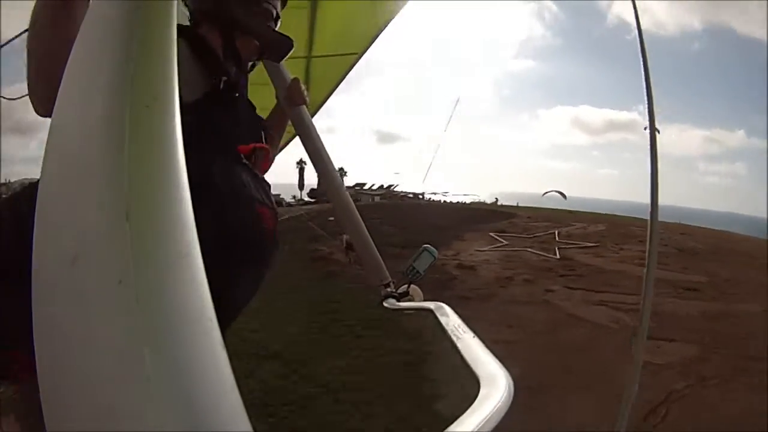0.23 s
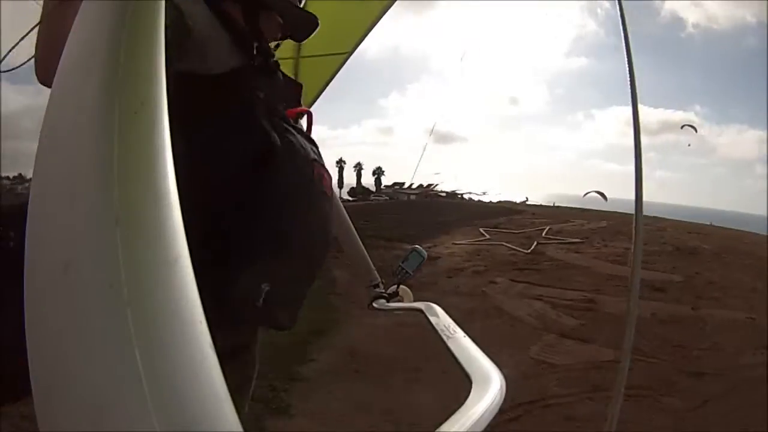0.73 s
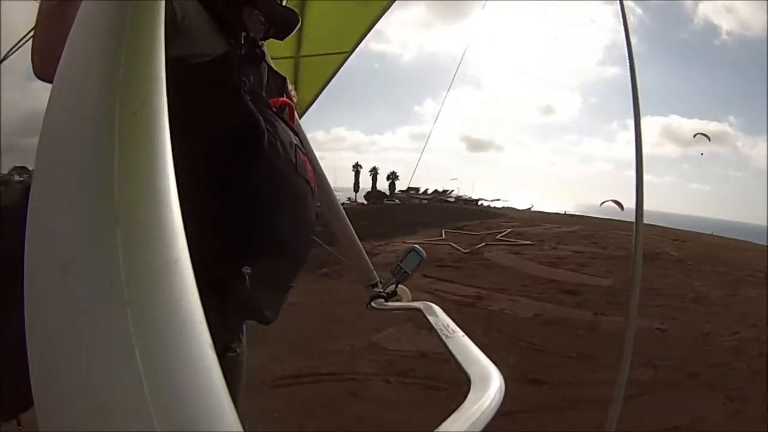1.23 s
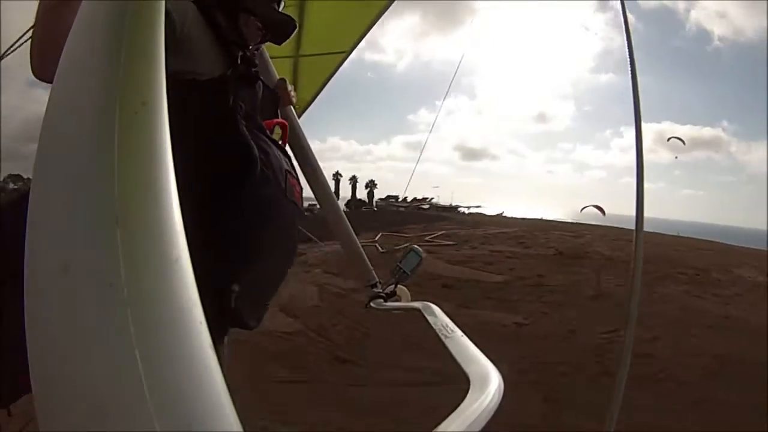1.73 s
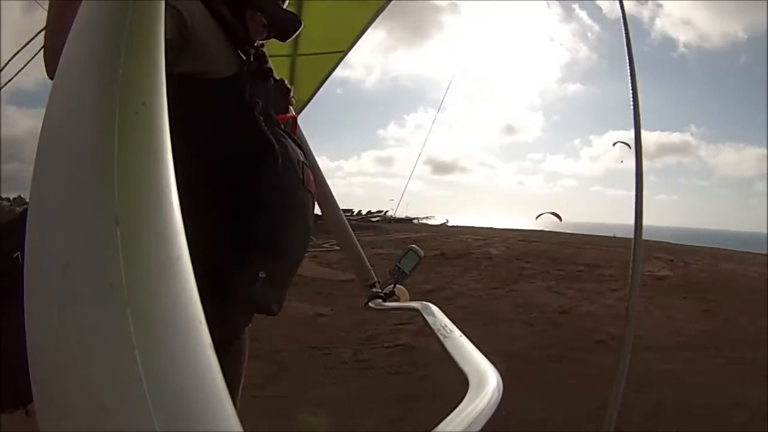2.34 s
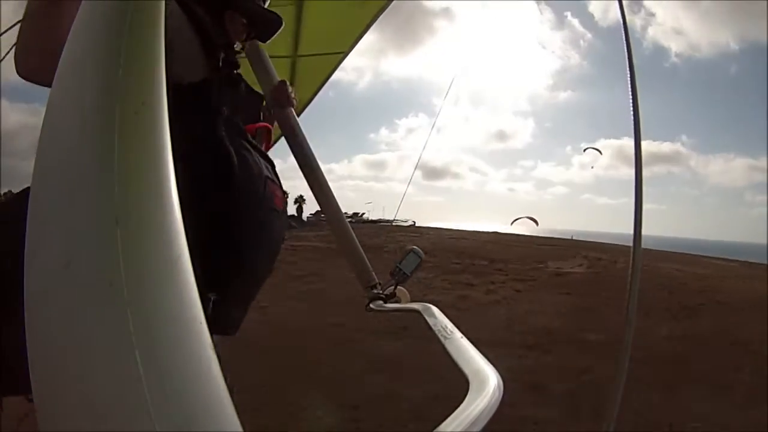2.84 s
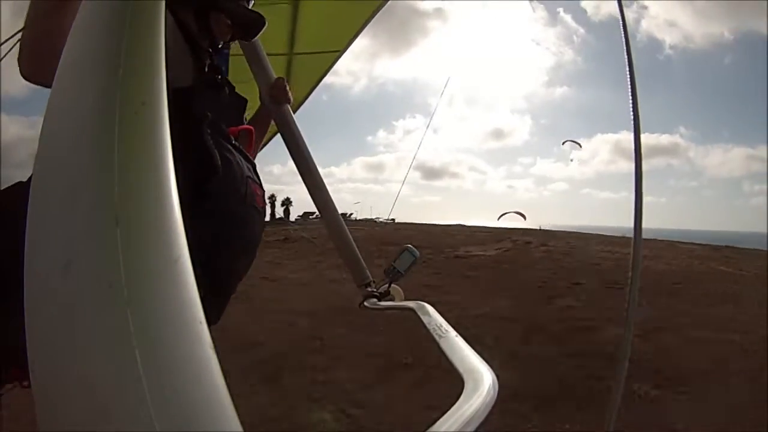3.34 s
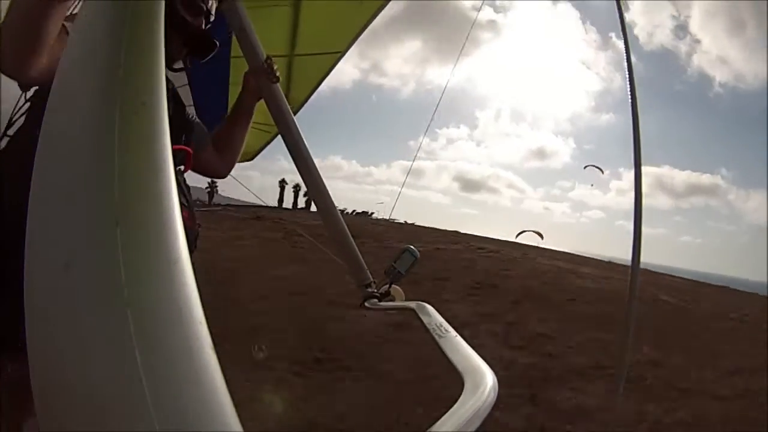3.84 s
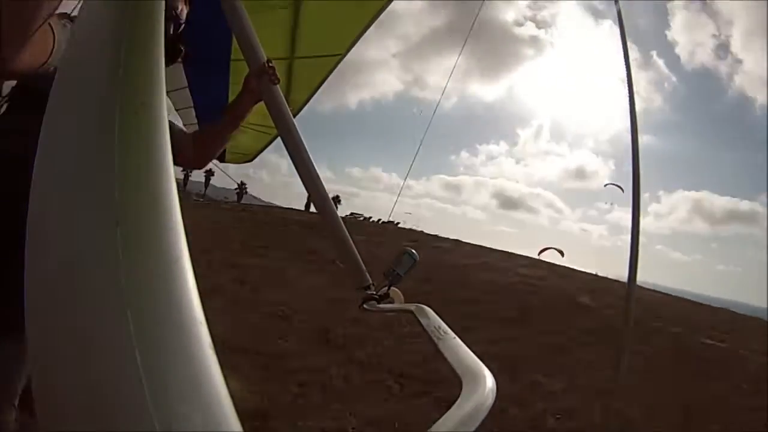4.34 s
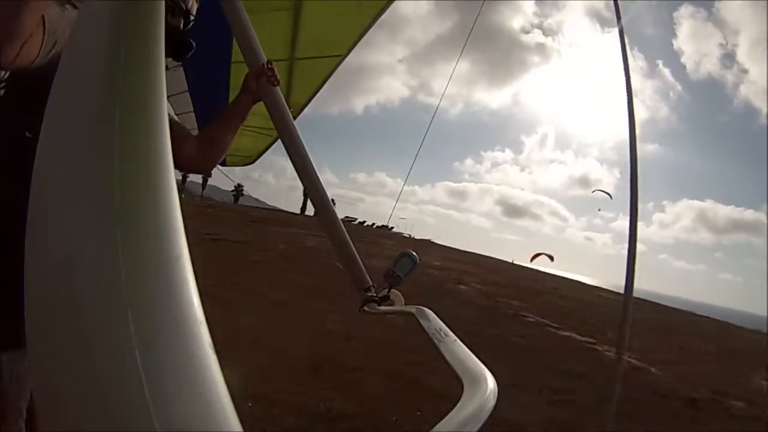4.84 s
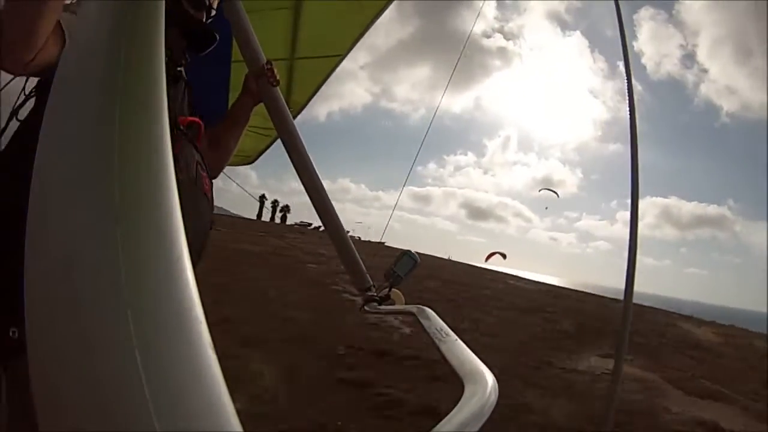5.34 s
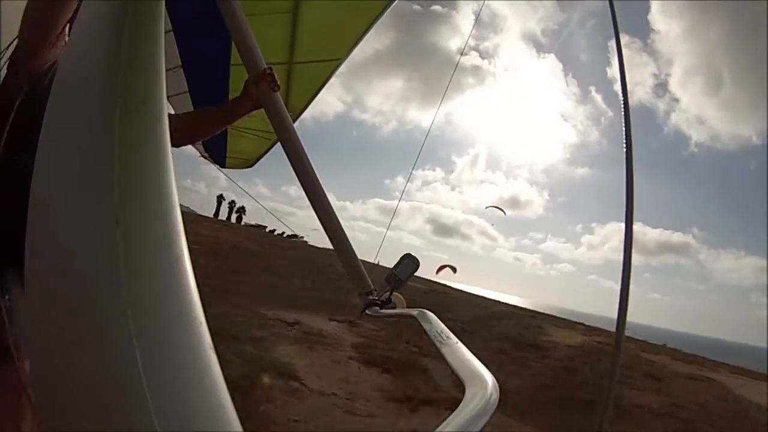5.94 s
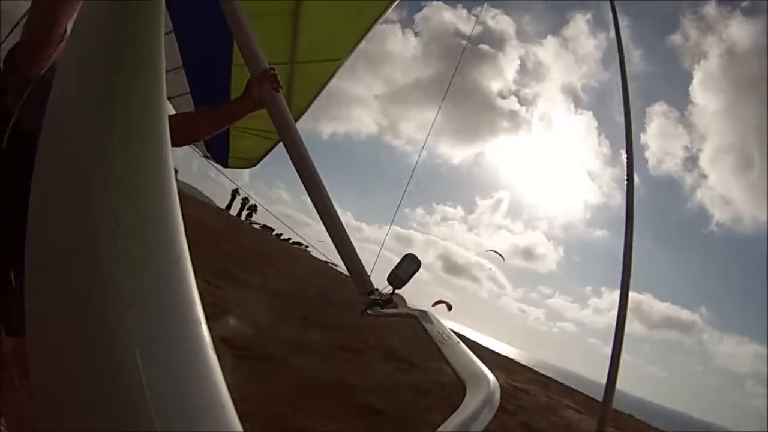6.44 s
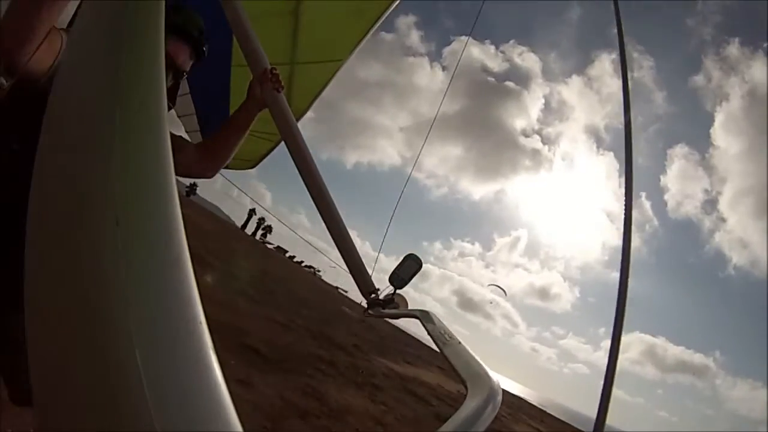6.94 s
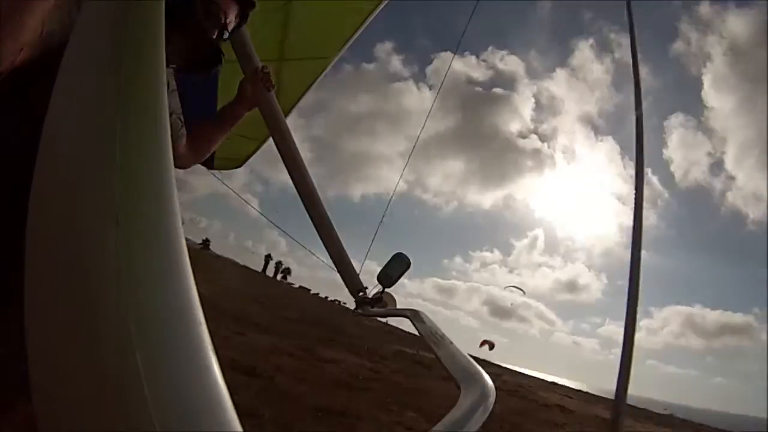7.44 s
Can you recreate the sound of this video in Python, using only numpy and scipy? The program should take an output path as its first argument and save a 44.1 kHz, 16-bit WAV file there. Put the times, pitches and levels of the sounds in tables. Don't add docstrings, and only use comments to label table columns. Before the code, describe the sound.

Outdoors on a flying hang glider, wind strikes a small frame-mounted camera's microphone directly: low rumbling buffets, fluttering rush and hiss, irregular heavy thumps and tiny ticks. After about six seconds loose fittings knock the aluminium tube; the rush then eases and a hand drags noisily along it, with a cluster of hard, short metallic knocks.

```python
import sys
import numpy as np
from scipy import signal
from scipy.fft import rfft, irfft, next_fast_len
from scipy.io import wavfile
from scipy.ndimage import uniform_filter1d, map_coordinates

SR = 44100
rng = np.random.default_rng(int(sys.argv[2]) if len(sys.argv) > 2 else 0)


def wav_record(signal):
    frames = np.transpose(np.atleast_2d(signal))
    bounded = np.clip(frames, -1, 1)
    quanta = np.round(bounded * 32767).astype(np.int16)
    wavfile.write(sys.argv[1], SR, quanta)


def ratio(d):
    e = np.asarray(d, float) / 20
    return 10 ** e


N = 339040


def unit(x):
    return x / np.sqrt(np.mean(x ** 2) + 1e-20)


def white():
    return rng.standard_normal(N)


def curves(rows):
    s, *columns = np.transpose(rows)
    return [np.interp(np.arange(N) / SR, s, column) for column in columns]


def wobble(rate):
    knots = rng.standard_normal(int(N * 400 / SR) + 4)
    return map_coordinates(knots, [np.arange(N) * rate / SR])


def coloured(x, spectrum):
    m = next_fast_len(N + 8192)
    f, db = np.transpose(spectrum)
    bins = np.fft.rfftfreq(m, 1 / SR)
    gain_db = np.interp(np.log(bins + 1), np.log(f + 1), db)
    return irfft(rfft(x, m) * ratio(gain_db), m)[:N]


def patchy(patchy_db):
    z = signal.stft(white(), nperseg=512)[2]
    field = uniform_filter1d(rng.standard_normal(z.shape), 6, 0)
    field = uniform_filter1d(field, 8, 1)
    return signal.istft(z * ratio(patchy_db * unit(field)), nperseg=512)[1][:N]


def eddies(rate, spread_db):
    hit = rng.random(N) < rate / SR
    sign = np.sign(white())
    size_db = spread_db * np.minimum(rng.exponential(size=N), 3.5)
    return unit(hit * sign * ratio(size_db))


def steadied(x, seconds, share):
    power = np.abs(uniform_filter1d(x ** 2, int(seconds * SR))) + 1e-12
    return unit(x / power ** (share / 2))


# t/s, pressure level/dB, lean to slow heaving level/dB
PRESSURE = [(0, -11, -19), (.2, -20, 2), (.35, -16.5, 0.5), (1.5, -15.5, -5), (1.9, -17, 0),
            (2.4, -16.5, -2), (3.1, -15, -2.5), (3.7, -18.5, 2.5), (4.4, -18.5, 1.5), (5.15, -17, -1),
            (5.57, -15.5, 4.5), (5.75, -20.5, 2.5), (6.45, -17, -1), (6.63, -15, 0), (7.2, -24.5, -4),
            (7.39, -20, -1.5), (7.5, -31, 3), (7.69, -26.5, 2.5)]
# f/Hz, level/dB per Hz
HEAVE = [(7, -34.5), (14, -11), (33, -1.5), (45, -1.5), (70, -32), (200, -50), (400, -120)]
# f/Hz, level/dB per Hz
BUFFET = [(20, -38), (35, -11), (50, 1), (76, 1.5), (500, -23), (650, -29.5), (1100, -120)]


def pressure_on_port(kicks):
    buffet_db, slow_db = curves(PRESSURE)
    heave_db = -25.5 + 0.05 * (buffet_db + 16.5) + slow_db
    heave = coloured(white(), HEAVE)
    buffet = coloured(patchy(patchy_db=0.75) + 0.45 * kicks, BUFFET) * ratio(1.4 * wobble(32))
    heave = ratio(heave_db + 1.5) * steadied(heave, seconds=0.12, share=0.48)
    return heave + ratio(buffet_db - 1.46) * steadied(buffet, seconds=0.11, share=0.51)


# peak t/s, lift level/dB, width/s
GUSTS = [(.239, 7.5, 0.077), (.43, 0, 0.024), (.58, 1, 0.057), (1.48, 7, .05), (1.66, 4.5, 0.06),
         (1.804, 4.5, 0.06), (1.94, 5.5, 0.073), (2.225, 3.5, 0.12), (2.452, 6.5, 0.034), (2.57, 3, 0.03),
         (2.803, 7.5, 0.042), (3.021, 1.5, 0.036), (3.205, 12, 0.045), (3.34, 6, 0.081), (3.59, 8, 0.069),
         (3.7, 4.5, 0.052), (3.875, 7, 0.1), (4.24, 7, .06), (4.41, 4.5, 0.042), (4.55, 1.5, 0.12),
         (5.22, 4, 0.042), (5.45, 6.5, 0.053), (5.632, 6, 0.042), (5.726, 11, 0.042), (5.891, 7, 0.082),
         (6.3, 6.5, 0.065), (6.585, 14.5, 0.018), (6.68, 10, 0.014), (6.944, 6, 0.036), (7.29, 15, 0.078)]


def gusts_db():
    rise_over_fall, squareness = 0.9, 3.3
    t = np.arange(0, N / SR, .002)
    s, lift_db, width = np.transpose(GUSTS)[:, :, None]
    side_width = width * np.where(t < s, rise_over_fall, 1)
    bells = lift_db * np.exp(-np.abs((t - s) / side_width) ** squareness)
    return np.interp(np.arange(N) / SR, t, bells.sum(0))


# t/s, strength level/dB, lean to coarse eddies level/dB
AIRSTREAM = [(0, -31, -3.5), (.11, -39, -5), (.55, -30, -2), (2.05, -38, -2), (2.55, -35, -3.5),
             (2.63, -41, 0), (2.98, -46.5, 1.5), (3.5, -45.5, -1), (4.05, -51.5, 1.5), (4.3, -35, -2.5),
             (4.78, -49, 9), (5.0, -36.5, 0), (5.55, -44.5, 3), (6.1, -41.5, 0), (6.47, -51, 3),
             (6.8, -61.5, -1), (7.12, -47, -1.5), (7.69, -42, -2)]
# f/Hz, level/dB per Hz
RUSH = [(88, -21), (150, -5.5), (195, -7), (446, -13.5), (603, -13.5), (650, -14), (1020, -15),
        (1100, -22.5), (1640, -29.5), (2140, -37), (3000, -45.5), (3900, -50), (6600, -120)]
# f/Hz, level/dB per Hz
HISS = [(600, -9), (1100, -4), (1400, -13), (1780, -6.5), (2200, -17.5), (2800, -14), (3400, -22),
        (4500, -29.5), (5300, -29), (6200, -37), (8200, -44), (11500, -52), (13500, -68), (15300, -77),
        (16000, -120)]


def flow_past_housing(kicks):
    flow_db, coarse_db = curves(AIRSTREAM)
    hiss_db = flow_db + gusts_db()
    rush_db = -25.5 + 0.57 * (hiss_db + 40.5) + coarse_db
    shelter_db = np.interp(np.arange(N) / SR, [6.97, 7.12], [.6, -11])
    flutter, shiver = wobble(35), wobble(90)
    rush = coloured(patchy(patchy_db=2.5) + 0.42 * kicks, RUSH)
    rush = rush * ratio(0.28 * flutter + shiver)
    hiss = coloured(patchy(patchy_db=-0.06) + 0.52 * kicks, HISS)
    hiss = hiss * ratio(0.27 * flutter + shiver + 0.29 * wobble(30))
    rush = ratio(rush_db + shelter_db) * steadied(rush, seconds=0.087, share=0.13)
    return rush + ratio(hiss_db + 3.0) * unit(hiss)


def wind():
    kicks = eddies(rate=500, spread_db=3.5)
    return pressure_on_port(kicks) + flow_past_housing(kicks)


# t/s, peak level/dB, push +1 or pull -1
THUMPS = [(1.171, -17, -1), (1.237, -12, 1), (1.37, -26, -1), (1.495, -8, 1), (1.6315, -6, -1),
          (1.69, -21, 1), (1.9947, -11, 1), (2.052, -4, -1), (2.4712, -6.5, -1), (2.61, -3.5, 1),
          (3.226, -7, -1), (3.4114, -2.5, -1), (3.638, -3, -1), (3.803, -6.5, 1), (4.4332, -0.5, -1),
          (4.862, -14, -1), (5.482, -13, -1), (5.731, -4.5, -1), (5.8583, -2.5, 1), (5.8938, -8, -1),
          (.0035, -6.5, -1), (0.0143, -2, 1), (.082, -5, -1), (1.525, -10, 1), (1.815, -6, -1),
          (2.151, -7.5, -1), (2.21, -7.5, -1), (2.2574, -10, -1), (2.3339, -8, -1), (2.681, -13, -1),
          (3.0627, -7.5, 1), (3.2913, -7, 1), (3.594, -3, -1), (3.963, -5.5, 1), (4.139, -6, 1),
          (4.2776, -5.5, -1), (4.601, -9, -1), (4.709, -5, 1), (4.939, -11, 1), (4.987, -10, 1),
          (5.132, -8, 1), (5.235, -5.5, -1), (5.538, -4.5, 1), (5.63, -5, -1), (6.0492, -5.5, -1),
          (6.689, -9, -1), (6.84, -9, -1), (6.958, -16, -1), (6.1323, -4, 1), (6.282, -3, 1),
          (6.4985, -3.5, 1), (6.5866, -1, -1)]


def thumps():
    t, swings = np.arange(N) / SR, np.zeros(N)
    for s, db, sign in THUMPS:
        u = (t - s) / .0014
        swing = np.exp(-u ** 2) - .5 * np.exp(-((u - 3) / 2) ** 2)
        swings += sign * ratio(db - 2) * swing
    return swings


# t/s, peak level/dB
TICKS = [(0.3232, -22), (.1955, -42), (.2855, -40), (.379, -41), (1.136, -45), (1.162, -43), (1.521, -45),
         (1.622, -46), (1.711, -40), (1.93, -47), (1.993, -41.5), (2.332, -47), (2.574, -45), (3.213, -49),
         (3.226, -48), (4.318, -46), (4.558, -48), (4.826, -51), (5.004, -49), (5.236, -46), (5.298, -49),
         (5.308, -48), (5.525, -46), (5.742, -41), (5.95, -45), (5.957, -46), (6.06, -45), (7.156, -45),
         (2.9605, -45), (3.4121, -42), (3.5746, -45), (3.595, -46), (3.8447, -48), (3.883, -48),
         (3.963, -48.5), (4.1256, -45), (4.137, -49), (4.2377, -42), (4.2777, -49), (4.304, -39.5),
         (4.457, -37), (4.7092, -42), (4.8874, -43), (5.6464, -43.5), (5.858, -42), (6.1769, -34),
         (6.289, -33.5), (6.3445, -34), (6.427, -32), (6.436, -39.5), (6.587, -41), (6.6892, -45.5),
         (7.2193, -27), (7.379, -13), (7.5268, -39), (7.6875, -38)]


def ticks():
    out, t = np.zeros(N + SR), np.arange(200) / SR
    for s, db in TICKS:
        dull = np.clip(-.02 * (db + 24.0), 0, .45)
        snap = signal.lfilter([1, dull], [1, -dull], rng.standard_normal(len(t)))
        out[round(s * SR):][:len(t)] += ratio(db - 5.0 - 60 * t / 0.0044) * snap
    return coloured(out[:N], [(1000, -21.5), (3000, 15.0), (4200, 13), (5500, 7), (7000, 8), (9500, -4),
                              (11800, 1), (13600, -14), (15000, -3.5), (16200, -35.5)])


# t/s, strength level/dB,
# favoured low mode f/Hz, hardness level/dB, metal share level/dB
KNOCKS = [(0.217, -21.5, 501, -3.5, -6), (6.03, -22, 600, -7, -10), (6.106, -15, 620, -13, -16),
          (6.36, -20, 584, -9, -5), (6.478, -12.5, 649, -11, -9), (6.4905, -5, 664, -13.5, -1),
          (6.514, -15, 649, -9, -15), (6.819, -24.5, 538, -11, -14), (6.852, -28.5, 662, -5, -20),
          (6.899, -7, 607, -47, -5), (6.9535, -12, 1140, -9.5, -2), (6.99, -20.5, 649, -14, -17),
          (7.0245, -9.5, 579, -3, -6.5), (7.071, -18, 646, -16, -12), (7.114, -24, 835, -11, -14),
          (7.146, -8, 583, -23, -19), (7.175, -8, 867, -11, -15), (7.194, -8.5, 587, -22, -1),
          (7.223, -13, 848, -11, -11), (7.239, -9.5, 619, -18, -12), (7.2695, -3, 840, -6.5, -12),
         (7.28, -6.5, 806, -25, -8), (7.289, -13, 814, -14, -3), (7.304, -6.5, 589, -12, -21),
         (7.329, -16, 630, -19, -7), (7.345, -6.5, 590, -42, 2), (7.367, -2, 560, -37, -1),
         (7.378, -3.5, 796, -10, -7), (7.391, 0.5, 820, -12, -4), (7.407, -10, 587, -7, -12),
         (7.463, -10.5, 640, -18, -8), (7.581, -24.5, 845, 2.5, -7.5), (7.6197, -13, 622, -2.5, -17),
         (7.644, -22, 554, -23, -3), (7.666, -12.5, 820, -8.5, -8),
          (6.483, -9, 649, -18, -8), (6.4965, -8, 655, -15.5, 0), (6.502, -13.5, 650, -14, -1),
            (7.03, -10.5, 960, -5, -9), (7.035, -16, 580, -12, -8), (7.142, -11.5, 840, -9.5, -16),
            (7.305, -22, 840, -5, -20), (6.909, -18, 610, -36, -8), (7.624, -16.5, 830, -14, -21),
            (5.805, -14, 1140, -17, -10), (6.205, -21, 952, -17, -10)]
# f/Hz, level/dB, t60/s
TUBE = [(579, 7, 0.026), (649, -7, 0.067), (840, 1.5, 0.042), (952, 4, 0.017), (1140, 2.5, 0.023),
        (1463, -8.5, 0.035), (1830, -3, 0.03), (1948, -0.5, 0.015), (2157, -7.5, 0.029),
        (2556, -6.5, 0.032), (2745, -3.5, 0.024), (3200, -2.5, 0.023), (3520, -7.5, 0.019),
        (3690, -11, 0.024), (4480, -18.5, 0.025), (5300, -30, .02)]


def tube_blow(t, low_db, low_hz, hard_db, metal_db, shake):
    hz, mode_db, t60 = np.transpose(TUBE)[:, :, None]
    middle_db = low_db + hard_db
    high_db = middle_db + metal_db
    length = 0.73 - 0.0358 * low_db
    rattle = ratio(middle_db - 10.5 - 60 * t / 0.054) * shake
    strength, detune, phase = rng.standard_normal((3, len(TUBE), 1))
    favoured_db = low_db - 16 * np.abs(np.log2(hz / low_hz))
    upper_db = np.where(hz < 2400, middle_db + 3, high_db + 3)
    group_db = np.where(hz < 1300, favoured_db, upper_db)
    swell = 1 - np.exp(-t * hz / 3.56)
    fade_db = -60 * (t / (t60 * length)) ** 1.19
    level = ratio(group_db + mode_db + 2.64 * strength + fade_db)
    modes = level * np.sin(2 * np.pi * (hz * (1 + .032 * detune) * t + phase))
    grate_db = 1.5 * unit(uniform_filter1d(rng.standard_normal(len(t)), 90))
    return rattle + ratio(grate_db) * np.sum(swell * modes, 0)


# t/s, peak level/dB, t60/s
PINGS = [
    (0.2179, -32, 0.14),
    (6.3579, -36, 0.099),
    (6.4911, -27, 0.14),
    (7.0239, -26.5, 0.12),
    (7.3904, -24, 0.062),
]


def ping(t, db, ring):
    drift_hz = 90 * np.exp(-t / 0.022) + 25 * uniform_filter1d(rng.standard_normal(len(t)), 60)
    sag = 2 * np.pi * np.cumsum(drift_hz) / SR
    pair = np.sin(2 * np.pi * 3490 * t + sag) + 0.63 * np.sin(2 * np.pi * (3490 + 18) * t + sag)
    return ratio(db + 1.0 - 60 * t / ring) * (1 - np.exp(-t / 0.0014)) * pair


def knocks():
    out, t = np.zeros(N + SR), np.arange(SR // 6) / SR
    blows = KNOCKS
    rattle = unit(coloured(white(), HISS))[:len(t) * len(blows)].reshape(-1, len(t))
    for (s, *blow), shake in zip(blows, rattle):
        out[round(s * SR):][:len(t)] += tube_blow(t, *blow, shake)
    for s, db, ring in PINGS:
        out[round(s * SR):][:len(t)] += ping(t, db, ring)
    return coloured(out[:N], [(300, -5.5), (500, -2), (5500, -1.0), (9000, -18), (16000, -39)])


# t/s, level/dB
PUFFS = [(0.668, -30), (0.847, -23), (1.904, -23), (2.243, -26), (2.454, -39), (2.704, -36), (2.807, -28),
         (3.093, -36), (3.571, -28), (3.806, -36), (3.887, -24), (4.14, -29), (4.562, -26.5), (4.703, -28),
         (4.885, -27), (5.203, -37), (5.227, -20), (5.273, -29), (5.365, -34), (5.528, -19.5),
         (5.637, -22.5), (5.69, -19), (5.73, -16.5), (4.487, -34), (5.431, -29.5), (5.676, -27),
         (6.204, -27), (6.276, -20), (6.394, -27)]


def spits():
    t, spits_db = np.arange(N) / SR, np.full(N, -90.)
    for s, db in PUFFS:
        spits_db = np.maximum(spits_db, db - .5 - 1100 * np.abs(t - s))
    spit = coloured(coloured(white(), HISS), [(1000, -1.0), (3000, -2.5), (9000, -13.5)])
    return ratio(spits_db) * unit(spit)


# t/s, hold/s, rub level/dB, cloth rustle over rub level/dB
SLIDES = [(2.768, .02, -48, -20), (2.884, .05, -51.5, -18), (2.943, 0.13, -48, -18), (3.2, .14, -63, -22),
          (4.295, .01, -56, -12), (4.437, .015, -44, -21), (4.565, .01, -53, -11), (4.82, 0.018, -68, -1),
          (5.718, 0.0092, -40.5, -28), (5.818, 0.17, -44.5, -25), (5.98, 0.37, -48.5, -17),
          (6.195, .03, -43.5, -13), (6.258, 0.06, -29.5, -26), (6.383, 0.034, -44, -15),
          (6.5, .08, -53, -13), (6.624, .38, -57, -13.5), (7.004, .015, -48, -23),
          (7.253, 0.11, -28.5, -22), (7.444, 0.013, -35, -15), (7.5, 0.12, -45.5, -16)]


def strokes_db():
    lands, leaves = 399, 159
    rest_rub_db, rest_rustle_db = -63.5, -87
    t = np.arange(0, N / SR, .002)
    s, hold, db, cloth_db = np.transpose(SLIDES)[:, :, None]
    rub_db = db - lands * np.maximum(s - t, 0) - leaves * np.maximum(t - s - hold, 0)
    rustle_db = rub_db + cloth_db
    levels = np.maximum(rub_db.max(0), rest_rub_db), np.maximum(rustle_db.max(0), rest_rustle_db)
    return [np.interp(np.arange(N) / SR, t, level) for level in levels]


# f/Hz, level/dB per Hz
SKIN = [(900, -32.5), (2000, -2.5), (3000, -9.5), (4200, -12), (5200, -4.5), (6000, -15.5), (7800, -22),
        (9000, -36), (10500, -73)]
# f/Hz, level/dB per Hz
RUSTLE = [(7500, -32), (9000, -9), (10200, -1), (11300, 1.5), (13000, -4), (13900, -12.5), (14900, -7.5),
          (15800, -90)]
# f/Hz, level/dB per Hz
DRONE = [(400, -43), (520, -15), (590, 7.5), (720, -7.5), (840, 1.5), (920, -5.5), (1100, -6), (1350, -27),
         (1830, -21.5), (2200, -29), (3000, -54)]
# t/s, level/dB
GRIP = [
    (6.8, -39.5),
    (6.9, -38),
    (7.15, -32.5),
    (7.3, -24.5),
    (7.4, -29),
    (7.44, -34),
    (7.52, -27.5),
    (7.688, -33.5),
]


def slides():
    rub_db, rustle_db = strokes_db()
    grip_db = curves([(6.4, -50)] + GRIP)[0]
    rub = patchy(patchy_db=1.7) + 0.62 * eddies(rate=640, spread_db=3.5)
    skin = unit(coloured(rub, SKIN) * ratio(2 * wobble(70)))
    rustle = unit(coloured(rub, RUSTLE) * ratio(2.1 * wobble(90)))
    drone = unit(coloured(rub, DRONE) * ratio(3.6 * wobble(55)))
    return ratio(rub_db - 4.0) * skin + ratio(rustle_db - 7.0) * rustle + ratio(grip_db - 0.6) * drone


# t/s, level/dB
WHISTLE = [(0, -98), (3.9, -95.5), (4.1, -85), (4.7, -83.5), (5.7, -88), (6.1, -86), (7.69, -86)]


def strap_whistle():
    hiss = coloured(white(), [(11000, -30), (12500, -7.5), (14000, -12), (14600, 0), (15300, 0.5), (15600, -60)])
    return ratio(curves(WHISTLE)[0] + 4 * wobble(25)) * unit(hiss)


def scene():
    swings = thumps()
    aside = 1 - np.clip(2.5 * uniform_filter1d(np.abs(swings), 200), 0, .6)
    mix = aside * wind() + swings + ticks() + knocks() + spits() + slides() + strap_whistle()
    return mix[None]


def top_cut(x):
    return signal.sosfilt(signal.butter(12, 15450, fs=SR, output="sos"), x)


def record(dry):
    soft = dry / (1 + np.abs(dry / .8) ** 4) ** (1 / 4)
    return top_cut(soft)


dry = scene()
out = record(dry)
wav_record(out)
```